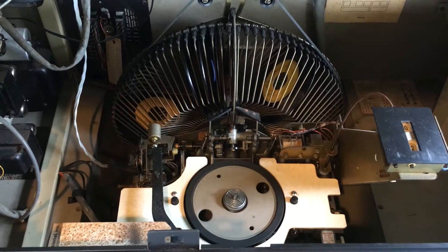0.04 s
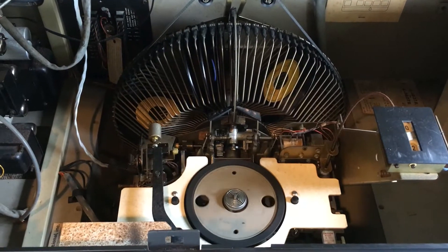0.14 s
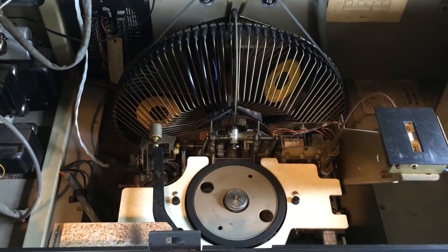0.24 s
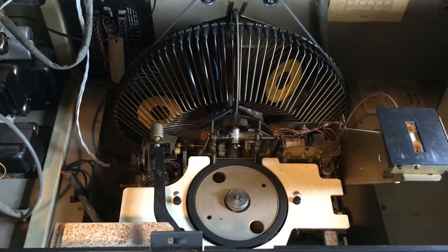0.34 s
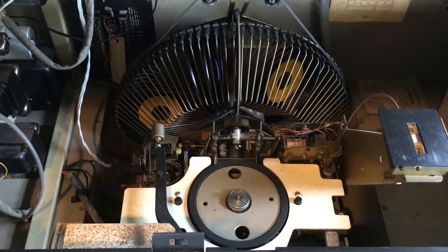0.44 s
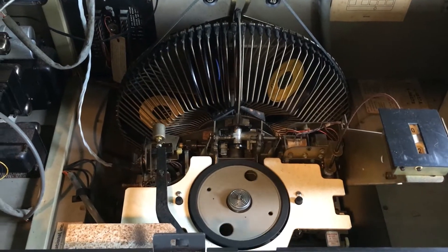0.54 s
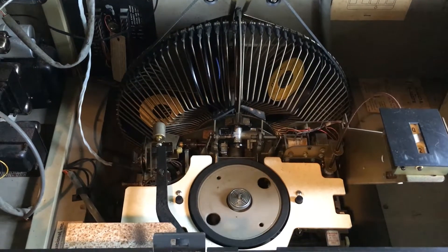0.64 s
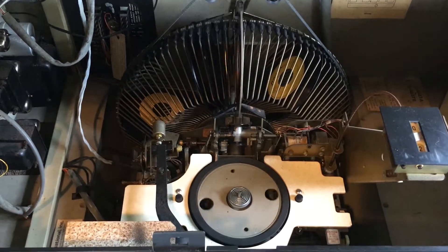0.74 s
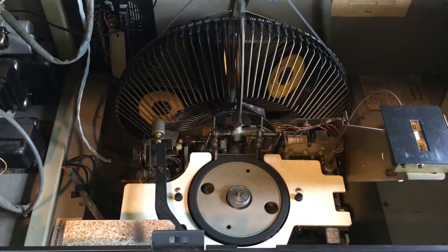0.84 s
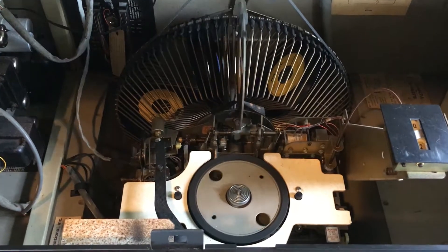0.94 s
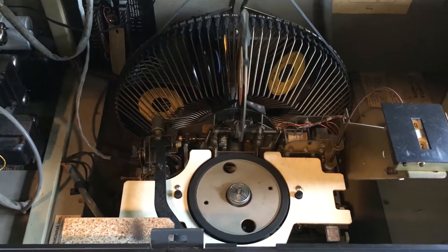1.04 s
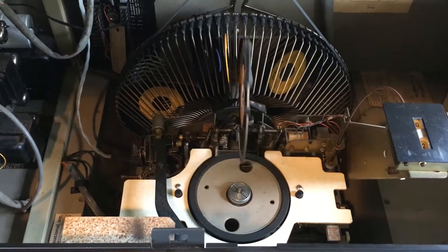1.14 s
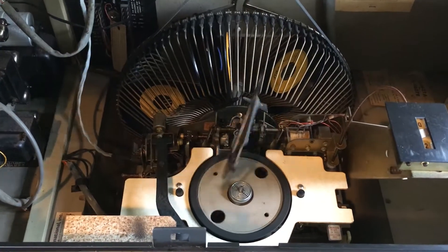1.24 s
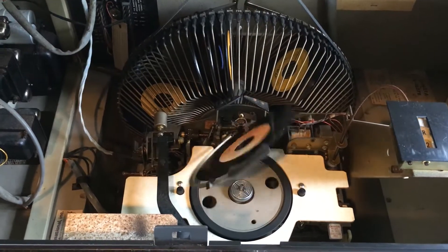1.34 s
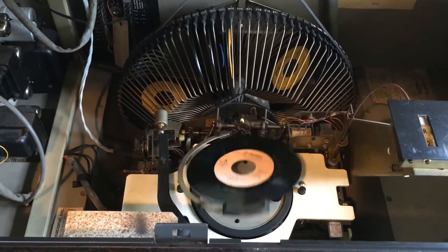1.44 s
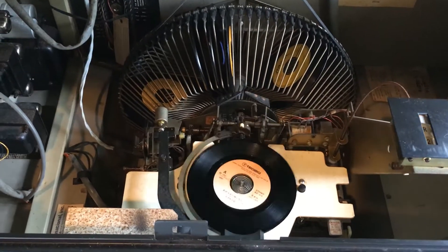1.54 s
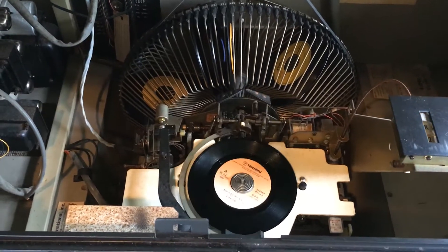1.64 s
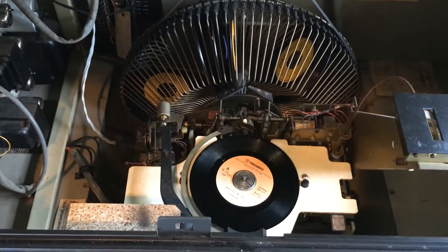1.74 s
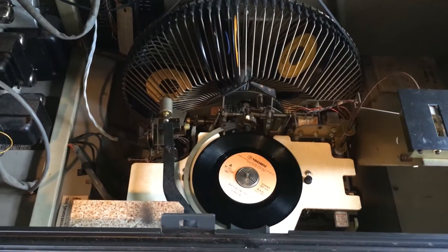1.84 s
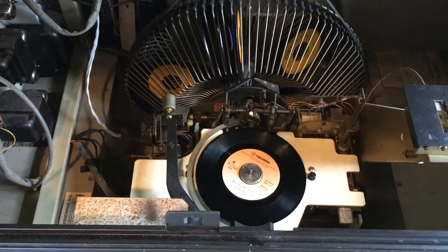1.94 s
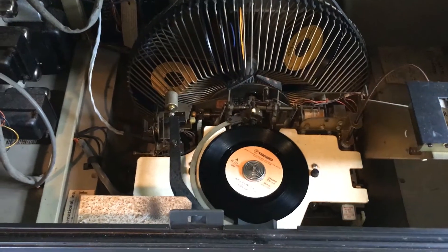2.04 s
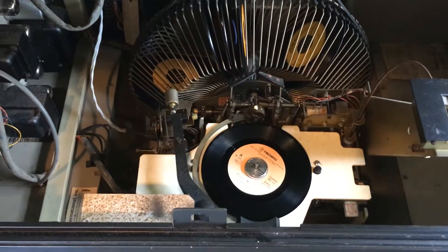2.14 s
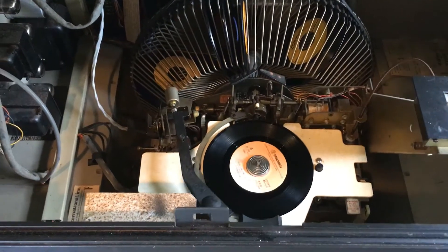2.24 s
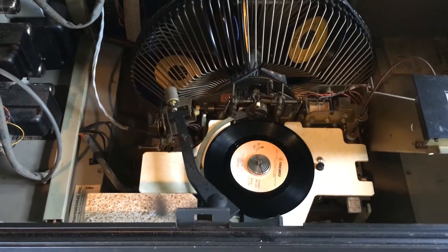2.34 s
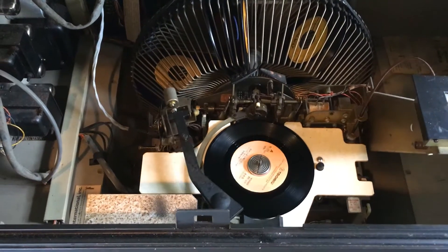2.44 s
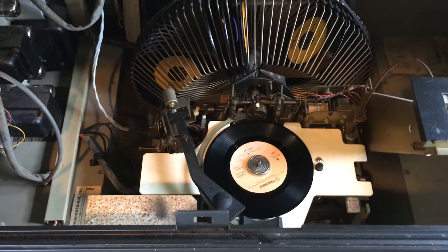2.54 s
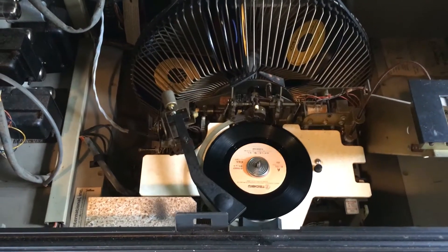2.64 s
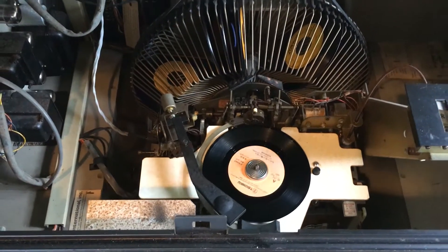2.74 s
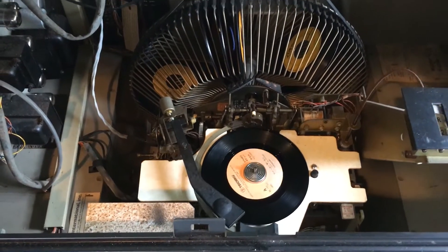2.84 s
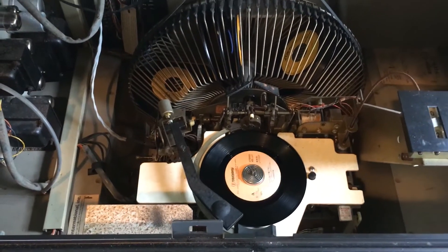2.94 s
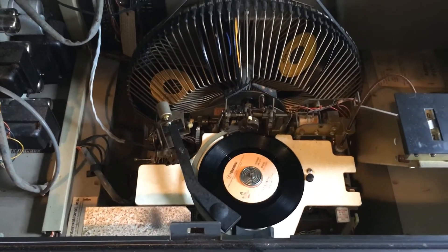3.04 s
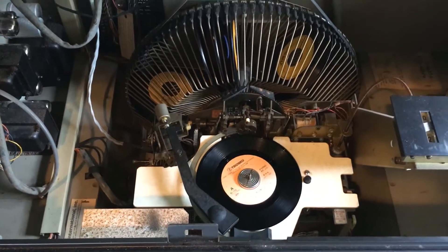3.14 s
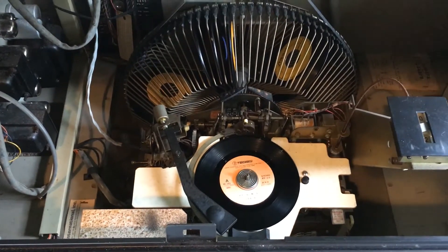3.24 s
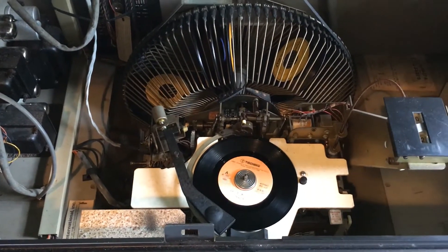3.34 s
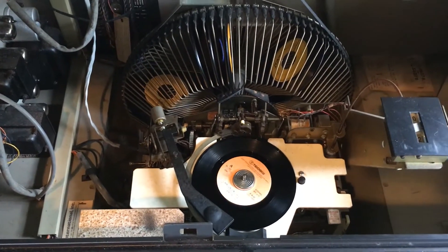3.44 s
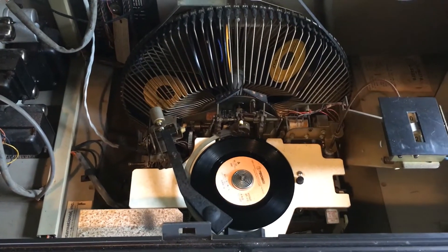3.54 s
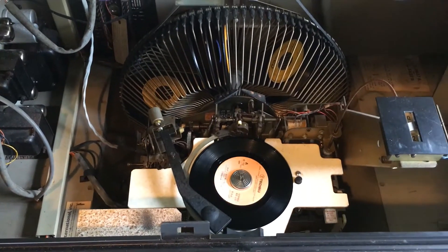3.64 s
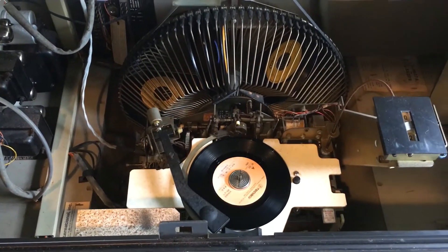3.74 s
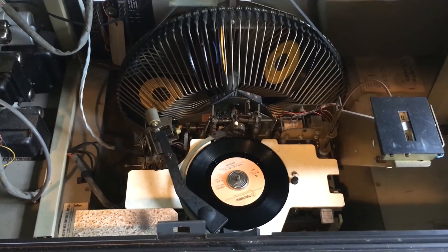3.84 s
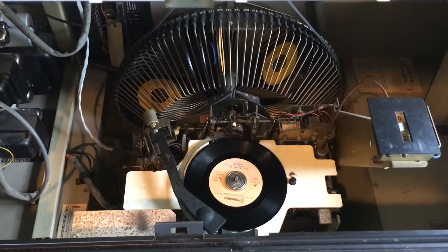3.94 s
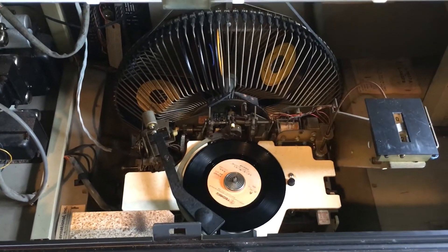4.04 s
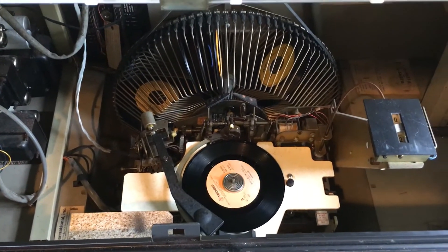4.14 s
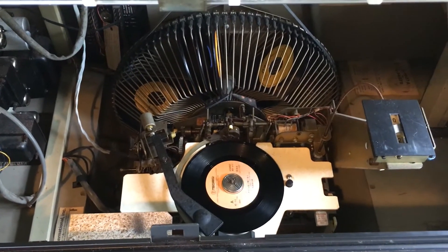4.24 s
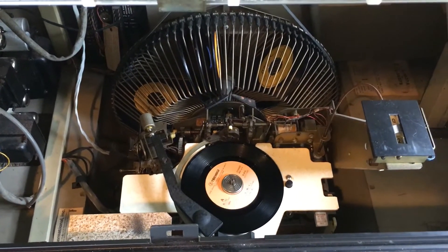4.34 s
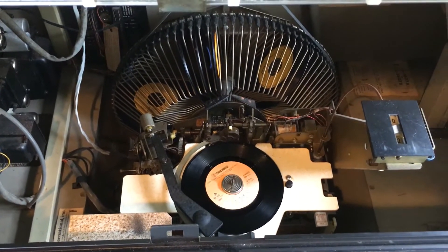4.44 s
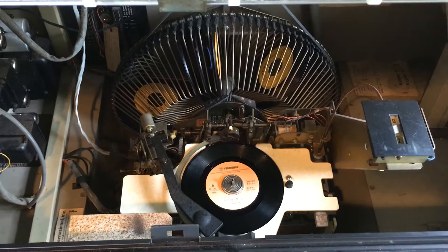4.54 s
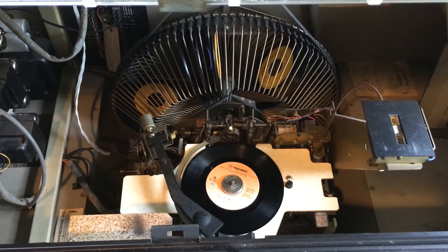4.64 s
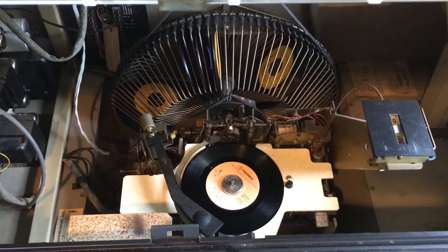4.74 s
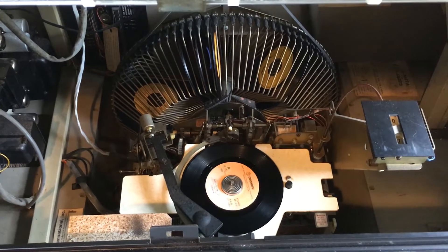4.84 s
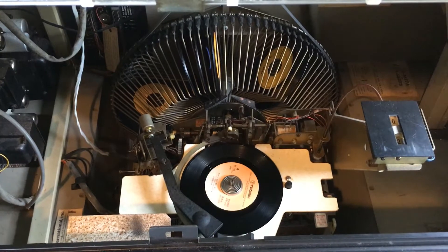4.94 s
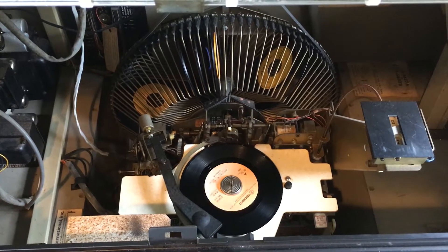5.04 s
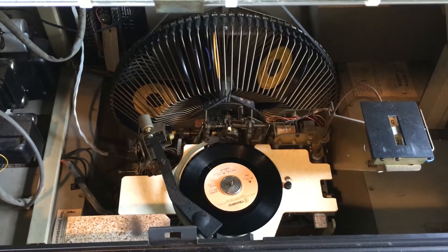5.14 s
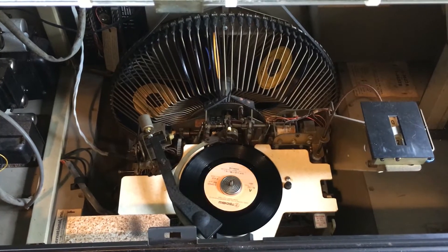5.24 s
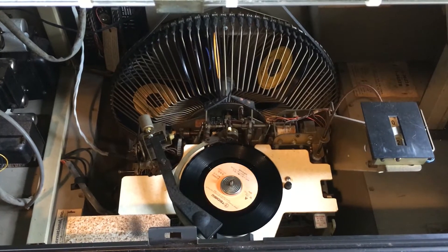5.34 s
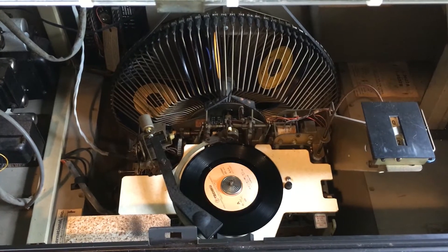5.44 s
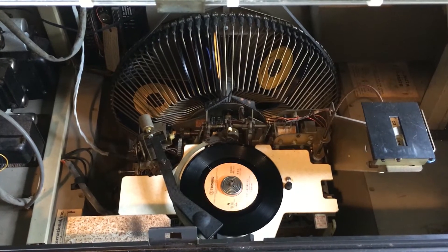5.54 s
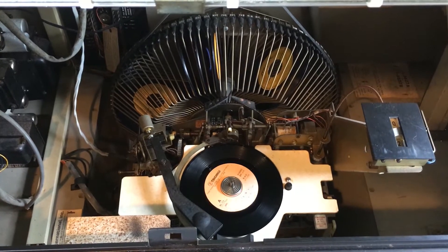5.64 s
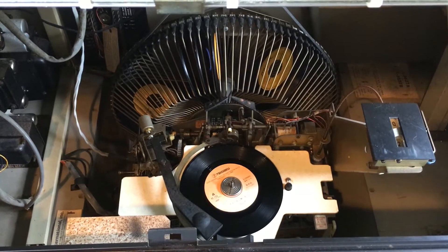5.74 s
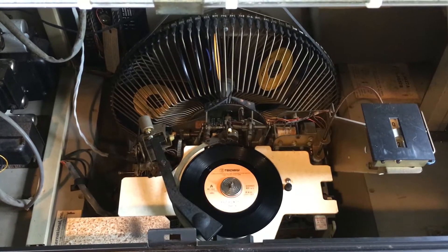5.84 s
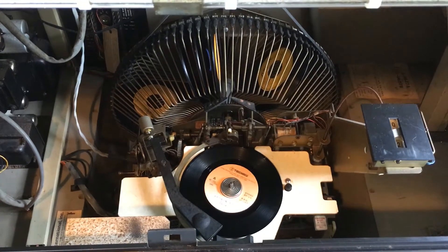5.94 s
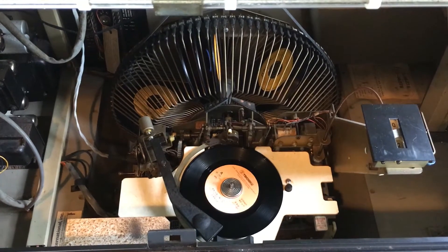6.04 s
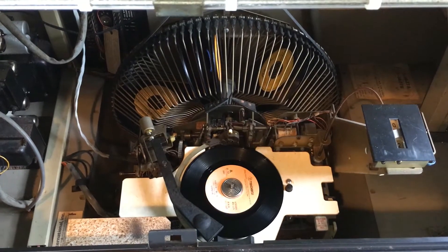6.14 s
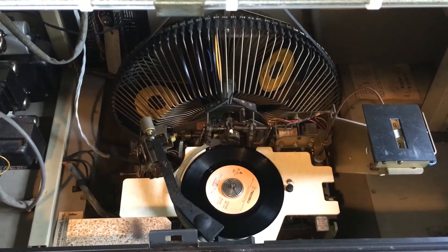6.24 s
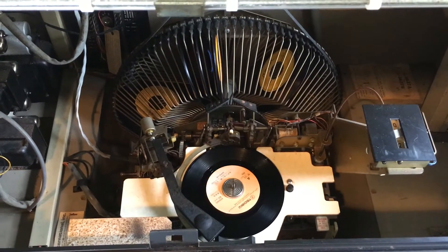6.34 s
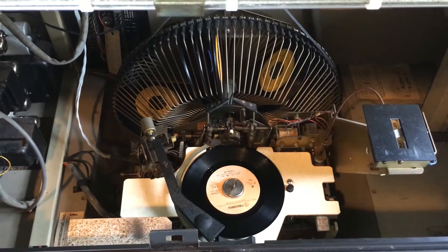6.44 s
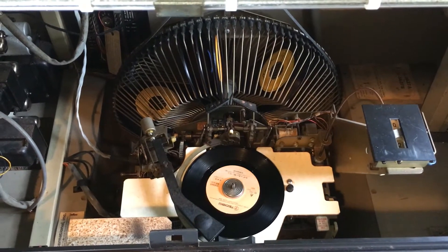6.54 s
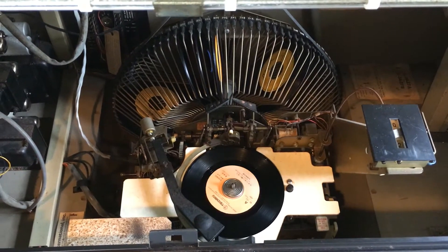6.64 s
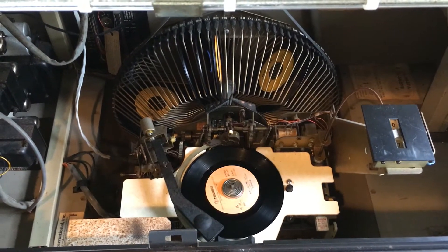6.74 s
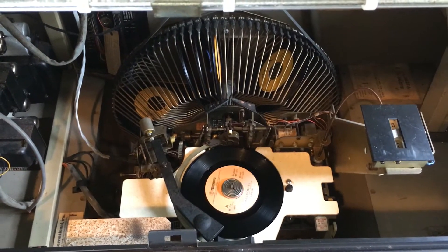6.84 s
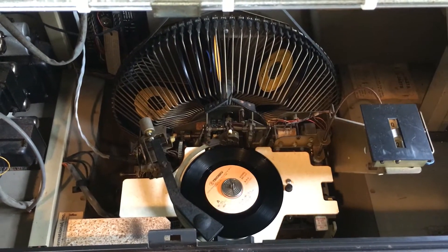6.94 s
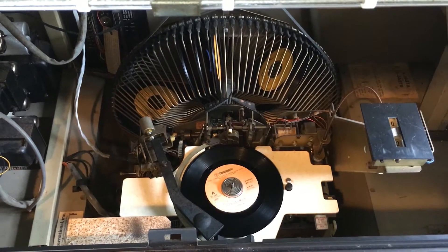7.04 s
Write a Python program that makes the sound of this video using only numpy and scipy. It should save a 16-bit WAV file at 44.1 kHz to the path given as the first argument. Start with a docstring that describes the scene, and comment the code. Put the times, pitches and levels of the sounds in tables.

```python
"""Jukebox record change

An old jukebox changes its record, heard from just above the open cabinet. Noisy tooth contacts make the gears
hiss while modal blows lay a disc on the turntable and the tone arm swings in. The gears stop with a clunk and
the motor's filtered noise coasts; levers click on over the turntable drive's sine hum and low noise rumble."""
import sys
import numpy as np
from scipy import signal
from scipy.fft import rfft, irfft
from scipy.io import wavfile
from scipy.ndimage import uniform_filter1d

SR = 44100
rng = np.random.default_rng(int(sys.argv[2]) if len(sys.argv) > 2 else 0)


def store_wav(level_fs):
    """Save 16-bit WAV to argv[1]."""
    pcm = np.round(np.clip(np.atleast_2d(level_fs), -1, 1) * 32767)
    wavfile.write(sys.argv[1], SR, pcm.T.astype(np.int16))


N = 312669
TIME = np.arange(N) / SR
FREQS = np.fft.rfftfreq(N, 1 / SR)
STOP_S, HANDOVER_S = 3.383, 0.27  # gears stop; load passes to the turntable drive
HUM_HZ = 120


def gain_of(db):
    """Decibels to amplitude."""
    return 10 ** (np.asarray(db) / 20)


def evened(x):
    """Scales to an rms of one."""
    return x / np.sqrt(np.mean(x ** 2) + 1e-20)


def sections(order, hz, kind):
    """Butterworth filter as second-order sections."""
    return signal.butter(order, hz, kind, fs=SR, output="sos")


def handover(before_db, after_db):
    """Amplitude that moves from one level to another as the changer stops."""
    progress = np.clip((TIME - STOP_S) / HANDOVER_S, 0, 1)
    return gain_of(before_db + (after_db - before_db) * progress)


def surge(t, peak_s):
    """Builds up to one at peak_s, then dies away."""
    u = np.maximum(t, 0) / peak_s
    return u * np.exp(1 - u)


def add(mix, start_s, sound):
    """Mixes a sound in at a given time."""
    part = mix[max(round(start_s * SR), 0):][:len(sound)]
    part += sound[:len(part)]


def coloured(x, colour, peaks=()):
    """Filters by a smooth spectrum with resonances on top, to an rms of one."""
    hz, db = np.transpose(colour)
    shape_db = np.interp(np.log(FREQS + 1), np.log(hz), db)
    for centre_hz, width_hz, height_db in peaks:
        shape_db = shape_db + height_db / (1 + (2 * (FREQS - centre_hz) / width_hz) ** 2)
    return evened(irfft(rfft(x) * gain_of(shape_db), N))


def wander(centre_hz, width_hz):
    """Random motion around one rate, rms one."""
    response = 1 / (1 + (2 * (FREQS - centre_hz) / width_hz) ** 2)
    return evened(irfft(rfft(rng.standard_normal(N)) * response, N))


def smoothed_noise(length, size):
    """Moving average of white noise, rms one."""
    return evened(uniform_filter1d(rng.standard_normal(length), size=size))


def cabinet(x, t60_s, wet_db):
    """Adds dense reflections from the cabinet walls and the room: a decaying noise tail."""
    t = np.arange(SR // 2) / SR
    tail = rng.standard_normal(len(t)) * gain_of(-60 * t / t60_s) * (t > .001)
    return x + gain_of(wet_db) * signal.fftconvolve(x, tail / np.linalg.norm(tail))[:N]


def gears(teeth_per_s=8000, spread_db=2.0, rub=1.2, flutter_db=1.5, chatter_db=1.1, buzz=0.036, shift_db=-1.0):
    """Tiny tooth impacts and rubbing; the load flutters and the motor's torque pulses with the mains."""
    # takes up its load, works hardest swinging the tone arm: time_s, level_db
    effort_points = [(0, -4), (.7, -1.6), (1.2, -.5), (1.9, -0.5), (2.35, 0), (2.8, -1.2), (3.35, -2)]
    # contact noise spectrum: pitch_hz, density_db_per_hz
    colour = [(200, -12), (400, -4.5), (600, -29), (950, -6.5), (1700, -7.5), (2500, -9.5), (3200, -7.5),
              (4200, -9), (5000, -10.5), (6600, -5.5), (10000, 1), (12900, 2), (16000, 0)]
    # gear and frame resonances: centre_hz, width_hz, height_db
    peaks = [(2640, 200, 0.5), (3550, 400, -2.5), (4450, 960, 3), (5640, 620, 5), (6700, 1000, 5),
             (8100, 260, 1), (10460, 450, -6.5), (11200, 400, 3), (11800, 300, 0.5), (12900, 700, 2.5),
             (14500, 1200, 1)]
    level_db, brake_db_per_s = -36, 800
    strength = gain_of(spread_db * np.minimum(rng.exponential(1, N), 4))
    teeth = strength * (rng.random(N) < teeth_per_s / SR)
    contact = evened(teeth * rng.choice([-1, 1], N)) + rub * rng.standard_normal(N)
    load = gain_of(flutter_db * wander(13, 26) + chatter_db * wander(55, 120))
    load = load * (1 + buzz * np.sin(2 * np.pi * HUM_HZ * TIME))
    hiss = coloured(travelling(contact), colour, peaks) + mesh()
    # only the bright part follows the load, the very top most unevenly
    dull = signal.sosfiltfilt(sections(2, 4500, "lowpass"), hiss)
    body = signal.sosfiltfilt(sections(2, 10500, "lowpass"), hiss)
    bright = body - dull + (hiss - body) * gain_of(shift_db * wander(12, 25))
    effort = gain_of(np.interp(TIME, *np.transpose(effort_points)))
    drive_db = level_db - brake_db_per_s * np.maximum(TIME - STOP_S, 0)
    return gain_of(drive_db) * (dull + bright * effort * evened(load))


def travelling(x, broad_db=0.76, narrow_db=3.0):
    """As the gears turn, the contact point travels through the frame: its resonances swell and fade."""
    z = signal.stft(x, nperseg=1024)[2]
    broad, narrow = rng.standard_normal((2, *z.shape))
    broad = evened(uniform_filter1d(uniform_filter1d(broad, size=12, axis=0), size=6, axis=1))
    narrow = evened(uniform_filter1d(uniform_filter1d(narrow, size=2, axis=0), size=16, axis=1))
    return signal.istft(z * gain_of(broad_db * broad + narrow_db * narrow), nperseg=1024)[1][:N]


def mesh(level_db=-15, width_hz=600, start_hz=8580, rise_hz_per_s=300):
    """The meshing teeth sing in a fuzzy band: noise-modulated carriers, slowly climbing."""
    phase = 2 * np.pi * np.cumsum(start_hz + rise_hz_per_s * TIME) / SR
    whistle = wander(0, width_hz) * np.cos(phase) + wander(0, width_hz) * np.sin(phase)
    return gain_of(level_db) * whistle


def gripper():
    """The gripper arm swings the disc over."""
    # blows: start_s, strength_db, body_db, hardness_db_per_octave
    hits = [(1.274, -34, -13, -6.5), (1.332, -36, -16, -1), (1.366, -36, -9.5, 3),
            (1.3786, -32.5, -10.5, 7)]
    # modes: pitch_hz, level_db, t60_s before ring
    modes = [(563, 4, 0.14), (885, 1.5, 0.17), (1450, 1, 0.08), (1720, -2.5, 0.11), (3080, -3, 0.088),
             (3530, -4.5, 0.086), (4080, 3.5, 0.07), (6240, -4, 0.066), (11560, 5, 0.03), (12400, 5, .03),
             (12850, 6, 0.032), (13600, 6, .032), (14150, 3, .03), (15000, 3, .03)]
    # metalwork resonances: centre_hz, width_hz, level_db
    frame = [(900, 174, 5), (1700, 400, 4), (2380, 260, 1), (5200, 400, -8.5), (7200, 1350, -7),
             (12900, 2800, 6)]
    return blows(hits, modes, frame, ring=0.9, ring_db=-5.5, scatter_db=-3.0,
                 crack_db=6, crack_s=0.00049, rise_s=0.0021, bloom_s=0.0013)


def disc():
    """The disc strikes the centre hub and rattles down it."""
    # blows: start_s, strength_db, body_db, hardness_db_per_octave
    hits = [(1.572, -17.5, -14.5, 4), (1.593, -26.5, -9, 7.5), (1.631, -36, -16, -5),
            (1.6415, -29, -11, 4.5)]
    # modes: pitch_hz, level_db, t60_s before ring
    modes = [(457, 8, 0.098), (596, -4, 0.24), (698, -2, 0.45), (840, 1.5, 0.24), (1147, 0.5, 0.11),
             (1350, -1, 0.086), (1425, 2, 0.082), (1464, 4, .07), (1730, -3.5, 0.058), (7878, -7.5, 0.091),
             (8550, -3.5, 0.076), (8700, -4, 0.063), (9230, -5, .06)]
    # metalwork resonances: centre_hz, width_hz, level_db
    frame = [(1000, 170, 2), (1410, 410, 12), (2320, 490, -4.5), (2680, 160, 5), (3520, 3100, 1),
             (9200, 530, 8.5)]
    return blows(hits, modes, frame, ring=0.55, ring_db=-1.5, scatter_db=-8.5,
                 crack_db=-20.0, crack_s=0.0011, rise_s=0.0018, bloom_s=0.0024)


def hub():
    """The metal hub answers the disc's first strike with a short ping."""
    # blow: start_s, strength_db, body_db, hardness_db_per_octave
    hits = [(1.572, -20.5, -7, 3.5)]
    # modes: pitch_hz, level_db, t60_s before ring
    modes = [(1380, -1, 0.085), (1560, 1, 0.055), (2606, 2, 0.09), (2730, 5, 0.046), (2830, -3, 0.036)]
    # metalwork resonances: centre_hz, width_hz, level_db
    frame = [(1450, 400, 3), (2200, 400, -8), (2700, 300, 0)]
    return blows(hits, modes, frame, ring=0.79, ring_db=-0.5, scatter_db=-17,
                 crack_db=-9, crack_s=0.00052, rise_s=0.0012, bloom_s=0.0016)


def platter():
    """The disc drops flat and sets the platter ringing."""
    # blows: start_s, strength_db, body_db, hardness_db_per_octave
    hits = [(1.658, -27, -7, 0), (1.675, -46, -7, -3)]
    # modes: pitch_hz, level_db, t60_s before ring
    modes = [(243, -4, .13), (463, 6, 0.19), (564, -4, 0.14), (705, -6, 0.19), (757, 2, 0.23),
             (1170, -5, .1), (1310, -14, 0.076), (1400, -9, .1), (1490, -1.5, 0.12), (5700, -2, .06),
             (6000, -8, .08), (6430, -3, .06)]
    # metalwork resonances: centre_hz, width_hz, level_db
    frame = [(955, 200, 7), (1500, 400, 8.5), (3300, 1600, 1), (6000, 1300, 8.5), (13000, 6000, -10)]
    return blows(hits, modes, frame, ring=0.88, ring_db=0.0, scatter_db=-9.0,
                 crack_db=-12, crack_s=0.0017, rise_s=0.0014, bloom_s=0.00092)


def cam():
    """The cam follower drops and chatters as the gripper lets go."""
    # blows: start_s, strength_db, body_db, hardness_db_per_octave
    hits = [(2.9852, -31.5, -3, 5.5), (2.9945, -27.5, -9, 5.5), (2.9995, -23, -8, -0.5),
            (3.0055, -24.5, -6, -5), (3.018, -35, -0.5, -3), (3.026, -30.5, -4, 0.5),
            (3.032, -35, -5.5, -8)]
    # modes: pitch_hz, level_db, t60_s before ring
    modes = [(248.5, -7.5, 0.35), (565, 2.5, 0.086), (724, -5, 0.11), (839, -2.5, .17), (930, -6.5, 0.3),
             (1450, -4, 0.089), (1790, -0.5, 0.065), (2660, -4, 0.083), (2980, -15, 0.3), (3395, 1.5, 0.05),
             (4160, -6, .07), (5680, -2, 0.065), (6040, 3, 0.038), (12650, 3, .035)]
    # metalwork resonances: centre_hz, width_hz, level_db
    frame = [(915, 140, 4), (1270, 247, -2), (3300, 820, 0.5), (4900, 340, -9), (6000, 650, 1),
             (12800, 1800, -1)]
    return blows(hits, modes, frame, ring=0.68, ring_db=-2.5, scatter_db=-3,
                 crack_db=-0.5, crack_s=0.00042, rise_s=0.0011, bloom_s=0.0012)


def switch(slip_body_db=2, slip_hardness_db_per_octave=4.5):
    """The end-of-cycle switch arm scrapes up its cam in uneven light, hard slips, then snaps over."""
    # blows: start_s, strength_db, body_db, hardness_db_per_octave
    snaps = [(3.3752, -24.5, -16, -6), (3.3835, -36, -3, -14)]
    # slips: start_s, strength_db
    scrape = [(3.3395, -51), (3.346, -52), (3.355, -49), (3.3605, -42)]
    # modes: pitch_hz, level_db, t60_s before ring
    modes = [(1100, -5, .1), (1556, -8, .08), (2670, -5, 0.084), (2815, -4.5, 0.18), (3046, 1, 0.067),
             (3250, -7, 0.052), (3570, -8, 0.23), (4260, -3, .06), (4460, -2, 0.058), (5400, -6, .06),
             (6250, -2, 0.13), (7050, -1, .06)]
    # metalwork resonances: centre_hz, width_hz, level_db
    frame = [(1500, 850, -15), (2040, 300, 0), (3200, 820, 2.5), (4400, 500, -1), (5140, 600, -5)]
    slips = [(start_s, db, slip_body_db, slip_hardness_db_per_octave) for start_s, db in scrape]
    return blows(snaps + slips, modes, frame, ring=0.48, ring_db=-0.5, scatter_db=-4.0,
                 crack_db=-0.5, crack_s=0.0011, rise_s=0.0012, bloom_s=0.0012)


def latch():
    """The stop latch falls in and shivers."""
    # blows: start_s, strength_db, body_db, hardness_db_per_octave
    hits = [(3.464, -46, 3, 7.5), (3.4665, -37.5, 8.5, 4.5), (3.549, -66, 17, 6.5), (3.566, -67, 14, 6)]
    # modes: pitch_hz, level_db, t60_s before ring
    modes = [(256, -5, 0.38), (286.6, -7, 0.37), (341, -9, 0.26), (374, -7, 0.41), (426, 5, 0.1),
             (475, -8, 0.42), (569, 1, 0.21), (612, 1, .11), (748, -3.5, 0.2), (1025, -5, 0.12),
             (1240, 1.5, 0.13), (1386, 4, 0.12), (1700, -5, .09), (1980, -3.5, 0.23), (2200, 9, 0.058),
             (9300, -12, 0.2), (12020, 5, 0.046), (12000, -11, .12), (12920, 5, .06), (13400, -7, 0.11),
             (14640, -4, .08)]
    # metalwork resonances: centre_hz, width_hz, level_db
    frame = [(550, 320, -1), (890, 620, 5), (1300, 220, -3), (2140, 280, 14.5), (3220, 1500, 1.5),
             (13000, 2200, 8.5)]
    return blows(hits, modes, frame, ring=0.98, ring_db=1.0, scatter_db=-8.5,
                 crack_db=-4.5, crack_s=0.0027, rise_s=0.0024, bloom_s=0.0057)


def levers():
    """Small levers and relays click."""
    # blows: start_s, strength_db, body_db, hardness_db_per_octave
    hits = [(3.9398, -44.5, -2, -2.5), (4.4161, -31, 1.5, -2.5), (5.8123, -42, -3, -2.5),
            (6.126, -42, -6, -3), (6.2989, -29, -2, -2), (6.347, -36.5, -2, -3.5), (6.796, -49, -1, -2.5)]
    # modes: pitch_hz, level_db, t60_s before ring
    modes = [(540, 5, 0.045), (625, -2, 0.044), (1585, -6, 0.11), (1790, -4, 0.08), (1967, 0, 0.059),
             (2384, -5.5, 0.08), (2558, 6.5, 0.043), (2880, -7, 0.035), (4200, -3, 0.036),
             (5870, -6, 0.039), (6500, -17, 0.042), (310, -4, 0.11), (3100, -5.5, 0.053), (2780, -16, .2),
             (5950, -16, .18), (6700, -14, 0.24)]
    # metalwork resonances: centre_hz, width_hz, level_db
    frame = [(620, 250, 3), (915, 230, -14), (1370, 430, -10), (1760, 320, 6.5), (2250, 160, 2),
             (2420, 220, 5), (3900, 990, -4.5), (5080, 440, -12), (5750, 1500, 4), (8300, 4600, -1),
             (14000, 8300, -2)]
    return blows(hits, modes, frame, ring=0.89, ring_db=-4.0, scatter_db=-7.0,
                 crack_db=-7.0, crack_s=0.0036, rise_s=0.0018, bloom_s=0.0012)


def detent():
    """A small detent pings just before a lever trips."""
    # blows: start_s, strength_db, body_db, hardness_db_per_octave
    hits = [(4.1044, -45, -15, -1), (6.2155, -45, -6, -8), (6.2206, -41, -14, -2.5)]
    # modes: pitch_hz, level_db, t60_s before ring
    modes = [(2412, -6, 0.08), (2580, 10, 0.055), (2939, 0, .09), (3190, 4, 0.077), (3530, -15, .08),
             (4200, -4, 0.055), (5975, -3, .07), (6982, -9, 0.06)]
    # metalwork resonances: centre_hz, width_hz, level_db
    frame = [(1800, 800, -11), (3100, 700, 2), (4830, 600, -12), (8200, 1800, -3), (13400, 1000, 4)]
    return blows(hits, modes, frame, ring=0.86, ring_db=-4.0, scatter_db=-6.0,
                 crack_db=-15.0, crack_s=0.002, rise_s=0.0009, bloom_s=.0008)


def spring():
    """A lever snaps home and sets its return spring ringing."""
    # blow: start_s, strength_db, body_db, hardness_db_per_octave
    hits = [(4.1664, -28, -5, -1)]
    # modes: pitch_hz, level_db, t60_s before ring
    modes = [(315, -3, 0.073), (435, 2, 0.064), (545, 8.5, 0.054), (630, 0, 0.064), (1900, 0, 0.038),
             (2382, -5, 0.044), (2510, 9, 0.03), (2514, -15, 0.32), (3010, -12, 0.15), (3250, -18, 0.21),
             (3560, -18, 0.31), (4570, -21, .28), (5450, -11, 0.089), (5575, -6, .09), (5980, -9, 0.1),
             (6300, -14, 0.12), (6720, -13, .22), (7050, -15, .2), (7450, -13, .1), (9950, -16, .16),
             (10500, -14, .16), (12500, -14, .16)]
    # metalwork resonances: centre_hz, width_hz, level_db
    frame = [(604, 200, -5), (915, 380, -12), (1340, 710, -15), (2960, 800, 7.5), (3880, 600, -5),
             (4940, 510, -17), (5800, 1100, 8.5), (8000, 1700, -14), (10200, 900, 2.5), (11600, 900, -12),
             (14800, 2000, -8)]
    return blows(hits, modes, frame, ring=0.8, ring_db=-3.5, scatter_db=-8.5,
                 crack_db=-9.0, crack_s=0.0031, rise_s=0.0009, bloom_s=0.00057)


def pawl():
    """A sprung pawl catches and falls back."""
    # blows: start_s, strength_db, body_db, hardness_db_per_octave
    hits = [(6.9175, -47, 7, -3), (6.923, -40, 5, -14), (6.9311, -29, -4, -6), (6.9405, -45, -1, 1.5),
            (6.96, -42, -1, -16), (6.9832, -35, -1, -24), (6.9905, -42.5, 3, -16)]
    # modes: pitch_hz, level_db, t60_s before ring
    modes = [(614, -5, 0.062), (1530, -9, 0.11), (1623, -7, .1), (1770, -5, 0.069), (1888, -9, 0.079),
             (1970, -5, 0.079), (2400, -5, 0.072), (2590, 0.5, 0.055), (2700, 8.5, 0.019), (4070, -4, 0.05),
             (4340, -8, 0.06), (5350, -5, .04), (5560, 4, 0.036), (6500, -4, .055), (7000, -4, 0.07),
             (8100, -15, .07)]
    # metalwork resonances: centre_hz, width_hz, level_db
    frame = [(650, 440, 3), (3500, 810, -18), (4800, 770, -17), (12000, 9000, -9)]
    return blows(hits, modes, frame, ring=0.79, ring_db=-1.5, scatter_db=-9,
                 crack_db=-15, crack_s=0.00098, rise_s=0.0012, bloom_s=0.00066)


def blows(hits, modes, frame, ring, ring_db, scatter_db, crack_db, crack_s, rise_s, bloom_s):
    """Each blow: a sharp crack, its scatter among the metalwork, and the struck part's modes; ring scales t60."""
    # bands of a blow: low_hz, high_hz (capped below), scatter t60_s before ring, level_db
    bands = [(296.7, 1320, 0.13, -0.5), (1260, 5000, 0.11, 0), (4590, 10600, 0.11, -1),
             (9930, 27500, 0.07, 2.5)]
    rattle_db, loose_hz = 3, 22  # scatter unevenness; rms pitch waver of a loose part
    clatter, ringing, t = np.zeros(N), np.zeros(N), np.arange(SR // 4) / SR
    decay = lambda t60_s: gain_of(-60 * t / max(t60_s * ring, .005))
    rise = 1 - np.exp(-t / rise_s)
    crack = gain_of(crack_db) * np.exp(-t / crack_s)
    for start_s, *blow in hits:
        # loose parts rattle, so the scatter comes in clumps
        rattle = evened(gain_of(rattle_db * smoothed_noise(len(t), 70)))
        # a part not seated firmly rings with an unsteady pitch
        drift = loose_hz * np.cumsum(smoothed_noise(len(t), 130)) / SR
        for low_hz, high_hz, t60_s, trim_db in bands:
            envelope = gain_of(scatter_db) * rise * decay(t60_s) * rattle + crack
            band = sections(3, [low_hz, min(high_hz, SR * .45)], "bandpass")
            burst = signal.sosfilt(band, rng.choice([-1, 1], len(t)) * envelope)
            level = gain_of(force_db(np.sqrt(low_hz * high_hz), *blow) + trim_db)
            add(clatter, start_s, level * np.sqrt(SR / 2 / (high_hz - low_hz)) * burst)
        for hz, mode_db, t60_s in modes:
            # the ring spreads through the part, low modes last
            swell = (1 - np.exp(-t / bloom_s)) * (1 - np.exp(-t * hz / 2))
            tone = np.sin(2 * np.pi * (hz * t + drift + rng.random()))
            level = gain_of(force_db(hz, *blow) + mode_db + ring_db)
            add(ringing, start_s, level * swell * decay(t60_s) * tone)
    return walls(framed(clatter, frame)) + ringing


def force_db(hz, strength_db, body_db, hardness_db_per_octave, body_hz=573, middle_hz=2238):
    """Blow spectrum: weight fills the bass, a hard contact reaches into the treble."""
    octaves = np.log2(hz / middle_hz)
    weight = np.clip(octaves / np.log2(body_hz / middle_hz), 0, 1)
    return strength_db + body_db * weight + hardness_db_per_octave * max(octaves, 0)


def framed(x, resonances):
    """Resonances lift or hollow the sound around their pitch."""
    for hz, width_hz, db in resonances:
        x = x + (gain_of(db) - 1) * signal.lfilter(*signal.iirpeak(hz, hz / width_hz, fs=SR), x)
    return x


def walls(x):
    """The direct sound and its first bright reflections."""
    # nearest cabinet walls: delay_s, level_db
    echoes = [(.0034, -7.5), (.0052, -12.5), (.0084, -24)]
    out, bright = x.copy(), signal.sosfilt(sections(2, 3000, "highpass"), x)
    for delay_s, db in echoes:
        add(out, delay_s, gain_of(db) * bright)
    return out


def thumps(swell_s=0.01):
    """The sprung chassis answers a jolt with a few low swings and knocks the wooden panels."""
    # jolts: start_s, level_db, pitch_hz
    jolts = [(0.531, -29.5, 63.4), (1.574, -40, 166), (1.66, -40, 158), (3.741, -22, 97),
             (4.164, -24.5, 103), (4.417, -27.5, 108), (6.3, -26, 104), (6.929, -32.5, 123.5)]
    # wooden cabinet modes: pitch_hz, level_db, t60_s
    panel_modes = [(147, -4, 0.081), (173, -13, 0.12), (231, -21, 0.094), (291, -24, 0.12)]
    out, t = np.zeros(N), np.arange(SR // 4) / SR
    panels = sum(gain_of(mode_db - 60 * t / t60_s) * np.sin(2 * np.pi * mode_hz * t)
                 for mode_hz, mode_db, t60_s in panel_modes)
    for start_s, db, hz in jolts:
        swing = surge(t, swell_s) * np.sin(2 * np.pi * hz * t)
        add(out, start_s, -gain_of(db) * (swing + panels))
    return out


def whir(throb=0.12):
    """The changer motor's bearings throb unevenly, louder while it labours, then coast to rest."""
    # labouring spells: start_s, end_s
    labours = [(0, 0.21), (2.6, 4.08)]
    # bearing noise spectrum: pitch_hz, density_db_per_hz
    colour = [(150, -7), (260, 1.5), (400, -3), (600, 2.5), (900, 2), (1400, -4), (2300, -12),
              (3500, -20.5), (5000, -29), (9000, -49)]
    level_db, labour_db, ramp_s = -55.5, 7.5, 0.041
    coast_s, coast_db_per_s = 4.45, 3
    labour = sum(np.clip(.5 + np.minimum(TIME - start_s, end_s - TIME) / ramp_s, 0, 1)
                 for start_s, end_s in labours)
    drive_db = level_db + labour_db * labour - coast_db_per_s * np.maximum(TIME - coast_s, 0)
    return gain_of(drive_db) * coloured(rng.standard_normal(N), colour) * (1 + throb * wander(45, 60))


def wheel(level_db=-58.5, first_s=0.18, turn_s=0.38, peak_s=0.0045, uneven_db=-1.0):
    """A drive wheel brushes its guide once a turn with a faint, high tick of noise."""
    # tick spectrum: pitch_hz, density_db_per_hz
    colour = [(9000, -30), (12000, -14), (13300, 1.5), (14800, -4), (16000, -7)]
    contact = sum(gain_of(uneven_db * rng.uniform(-1, 1)) * surge(TIME - start_s, peak_s)
                  for start_s in np.arange(first_s, N / SR, turn_s))
    return gain_of(level_db) * contact * coloured(rng.standard_normal(N), colour)


def turntable(sway_hz=41.14, sway_width_hz=8, waver=0.095, shaken_db=-6, bed_db=-52.5):
    """Rumble, the chassis swaying on its springs, bearing noise with room air, and mains hum."""
    # shifts of weight rock the chassis: start_s, level_db, build_up_s
    rockings = [(0, -40.5, 0.18), (1.5, -35, 0.41), (4.1, -38.5, 0.35), (6.3, -40, .35)]
    # rumble spectrum: pitch_hz, density_db_per_hz
    rumble_colour = [(18, -48), (28, -30.5), (34, -42), (45, -0.5), (62, 5.5), (85, 3.5), (100, -5),
                     (130, -9.5), (155, -15), (200, -10), (250, -18.5), (330, -22), (500, -48.5)]
    # bearing noise and room air: pitch_hz, density_db_per_hz
    bed_colour = [(180, -6), (300, -5), (440, -10.5), (600, -9), (900, -7.5), (1200, -14), (2100, -11.5),
                  (3200, -18), (4900, -25), (8000, -31), (11000, -26.5), (16000, -40)]
    # their resonances: centre_hz, width_hz, height_db
    bed_peaks = [(2470, 432, -2), (3720, 500, -0.5), (4900, 360, -5), (6100, 1400, 4), (10600, 700, -19),
                 (12450, 300, 12), (15550, 150, 2)]
    # hum, a row per multiple of HUM_HZ: running_db (changer running), after_db
    hum_levels = [(-64, -49), (-58.5, -60.5), (-58.5, -57), (-68, -58.5), (-74, -63), (-85.5, -67.5)]
    rocking = sum(gain_of(db) * surge(TIME - start_s, build_s) for start_s, db, build_s in rockings)
    rumble_level = np.hypot(handover(-42.5, -40), gain_of(shaken_db) * rocking)
    rumble = rumble_level * coloured(rng.standard_normal(N), rumble_colour)
    swing = signal.hilbert(wander(sway_hz, sway_width_hz))
    stiffened = evened(swing.real / (abs(swing) + 1.5))  # the springs stiffen on wide swings
    sway = np.hypot(handover(-43.5, -39.5), rocking) * stiffened
    air = cabinet(rng.standard_normal(N), t60_s=0.51, wet_db=-17.5)
    bed = gain_of(bed_db) * coloured(air, bed_colour, bed_peaks)
    hum = np.zeros(N)
    for multiple, (running_db, after_db) in enumerate(hum_levels, 1):
        tone = np.sqrt(2) * np.sin(2 * np.pi * (multiple * HUM_HZ * TIME + rng.random()))
        hum += handover(running_db, after_db) * (1 + waver * wander(0, 4.3)) * tone
    return rumble + sway + bed + hum


def dipped(x, top_hz=8900):
    """The sound dips briefly a few times, leaving the bass alone."""
    # dips: centre_s, half_length_s, lower_edge_hz, depth_db, top_treble_depth_db
    dips = [(0.24, 0.0066, 400, 9, 0), (2.137, 0.01, 400, 14, 0), (2.573, 0.016, 220, 32, -1),
            (3.057, 0.005, 500, 5, 13), (3.245, 0.0072, 400, 15, 1), (3.33, 0.0077, 400, 13, 1),
            (4.985, 0.016, 2420, 37, 15), (6.316, 0.0092, 2500, 11, 32)]
    above = lambda hz: signal.sosfiltfilt(sections(3, hz, "highpass"), x)
    top, out = above(top_hz), x
    for centre_s, half_s, edge_hz, depth_db, top_depth_db in dips:
        shape = np.exp(-np.minimum(((TIME - centre_s) / half_s) ** 2, 10) ** 2)
        out = out - (1 - gain_of(-depth_db * shape)) * (above(edge_hz) - top)
        out = out - (1 - gain_of(-top_depth_db * shape)) * top
    return out


def scene():
    """All moving parts inside the one cabinet."""
    knocks = gripper() + disc() + hub() + platter() + cam() + switch()
    knocks += latch() + levers() + detent() + spring() + pawl()
    machine = gears() + cabinet(knocks, t60_s=0.24, wet_db=-14.0) + thumps()
    return dipped(machine + whir() + wheel() + turntable())[None]


def record(dry, edge_hz=16000):
    """The microphone loses the deepest bass; then the band limit."""
    heard = signal.sosfilt(sections(6, 33, "highpass"), dry)
    return signal.oaconvolve(heard, signal.firwin(255, edge_hz, window=("kaiser", 9), fs=SR)[None], "same")


dry = scene()
out = record(dry)
store_wav(out)
```